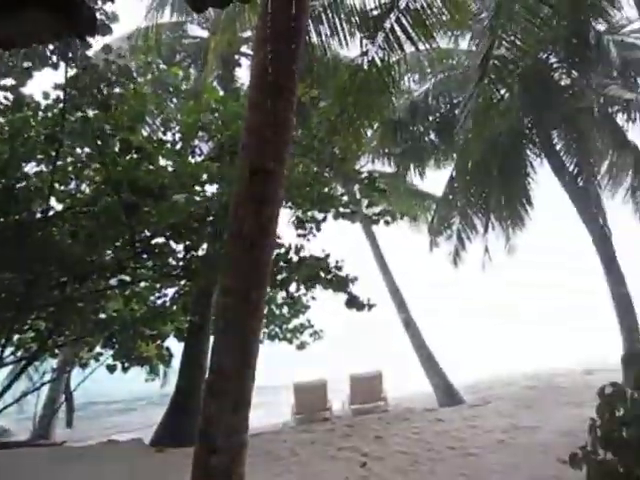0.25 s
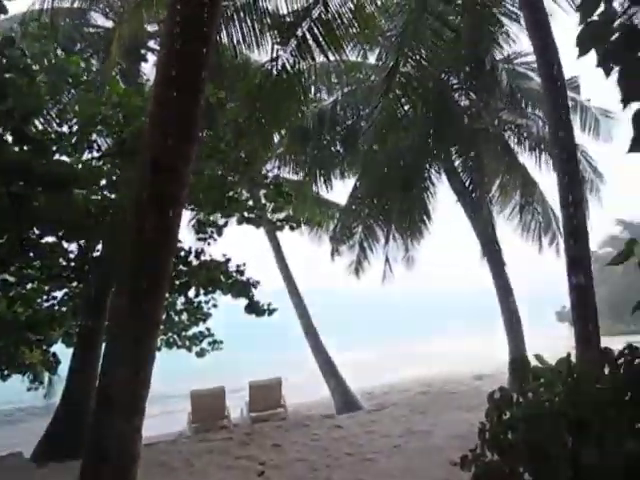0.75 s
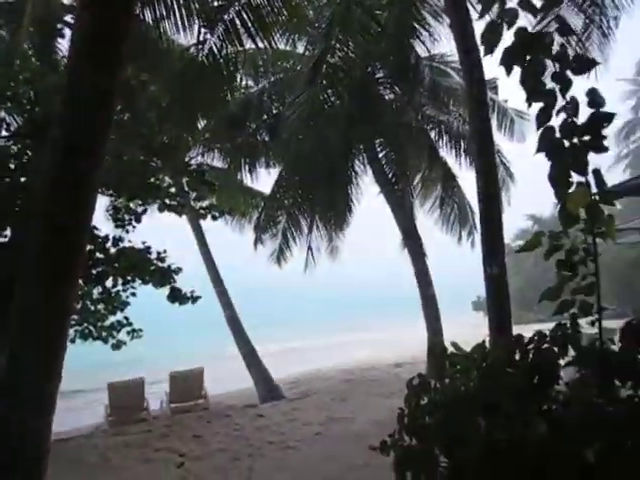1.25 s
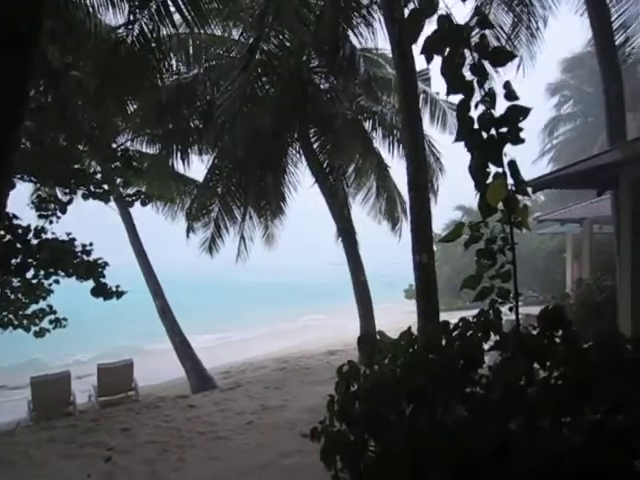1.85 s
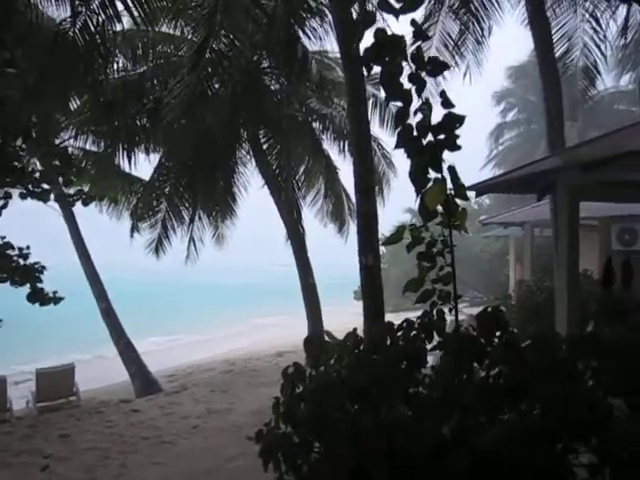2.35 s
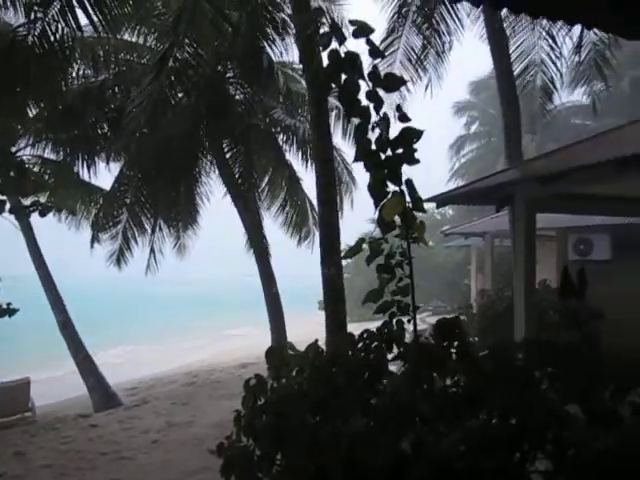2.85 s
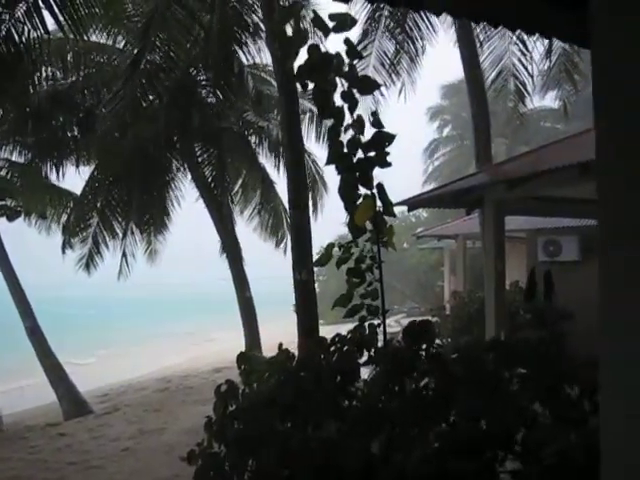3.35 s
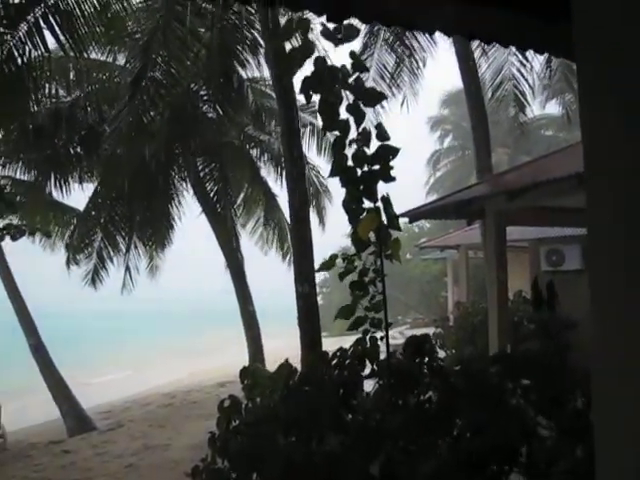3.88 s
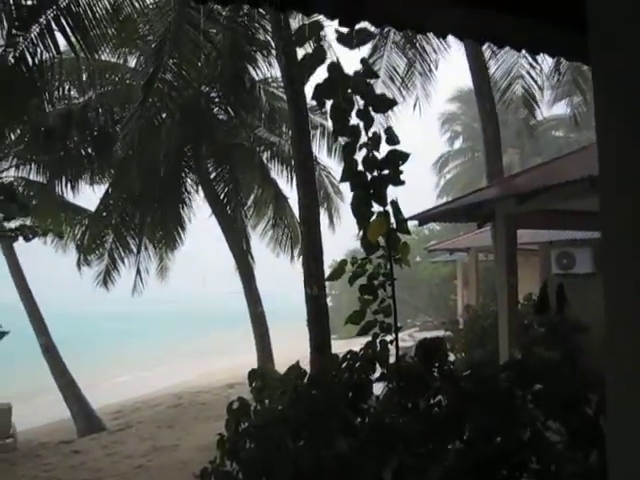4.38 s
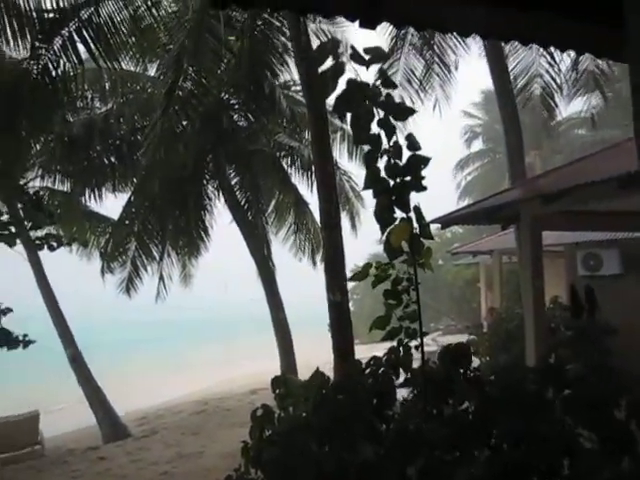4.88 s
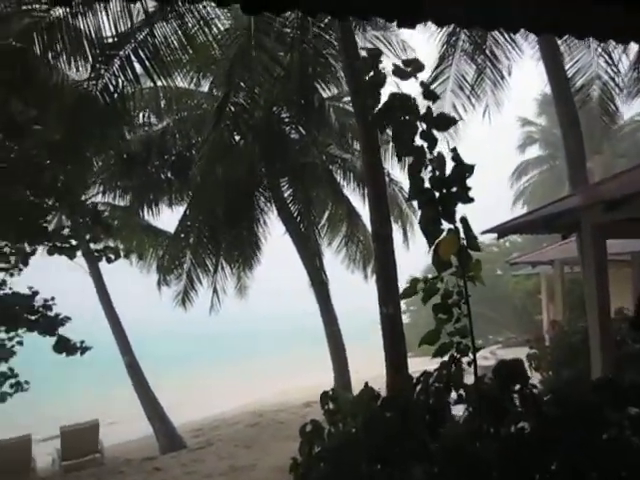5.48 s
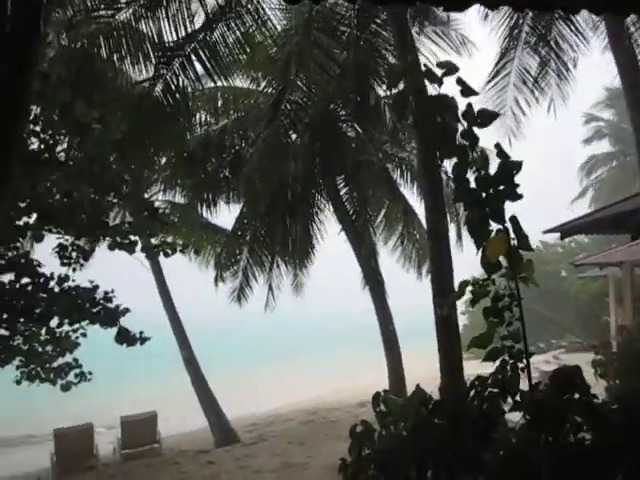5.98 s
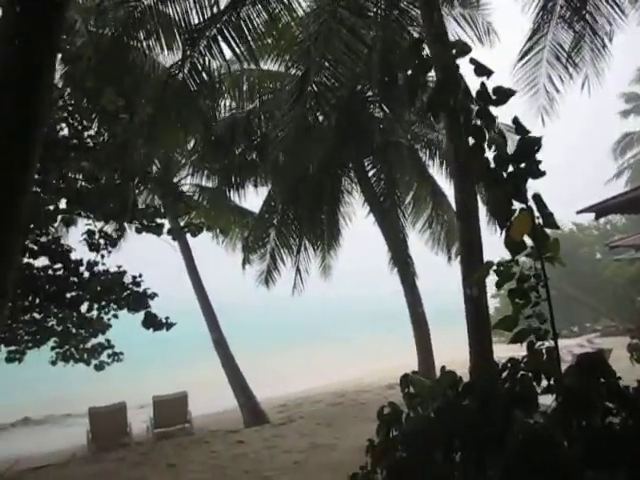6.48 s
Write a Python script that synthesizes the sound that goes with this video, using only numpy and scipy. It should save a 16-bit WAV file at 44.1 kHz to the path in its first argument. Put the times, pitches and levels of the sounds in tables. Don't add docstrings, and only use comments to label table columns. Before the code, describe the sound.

From the start, heavy rain is at full strength and stays nearly constant to the end at about 6.7 seconds: a broad midrange roar from sand and distant foliage under a dense, bright, grainy hiss from leaves. Fine ticks pepper it throughout, with a few crisp drops at 0.3 to 0.5. At 0.98 the sound almost vanishes for some 40 milliseconds, with a very faint ring, then quickly recovers. Low, blunt wind bumps strike the microphone from 1.27 to 1.63, strongest near 1.5, and more softly from 2.28 to 2.65. A bright drop snaps at 2.5, a lower spatter comes around 3.25, and a strong tick at 3.86. From 4 onwards the hiss is slightly brighter, with frequent leaf drops and short splashes, notably at 5.93. Faint wind remains near the end. Close small microphone, dry outdoor space, nearly mono with slight treble width.

```python
import sys
import numpy as np
from scipy import signal
from scipy.fft import rfft, irfft, next_fast_len
from scipy.io import wavfile
from scipy.ndimage import uniform_filter1d, map_coordinates

SR = 44100
rng = np.random.default_rng(int(sys.argv[2]) if len(sys.argv) > 2 else 0)


def undo_db(level):
    steps = np.asarray(level, float) / 20
    return 10 ** steps


def inscribe(sig):
    pcm = np.round(np.clip(np.atleast_2d(sig).T, -1, 1) * 32767)
    wavfile.write(sys.argv[1], SR, pcm.astype(np.int16))


N = 296793
TOP_HZ = 15735

# [t/s, level/dB]
DOWNPOUR = [
    (0.0, -22),
    (0.75, -21),
    (0.92, -22),
    (1.14, -21.5),
    (1.31, -21),
    (2.34, -21.5),
    (3.07, -21.5),
    (5.77, -22),
    (6.73, -21.5),
]
# [t/s, share]
FACING_LEAVES = [(0, 0.25), (.7, 0.1), (1.1, 0), (1.4, 0.04), (2.0, .1), (2.6, 0.25), (3.3, .3),
                 (4.0, 0.97), (4.8, 0.6), (5.6, 0.8), (6.2, 1), (6.73, .8)]
# [f/Hz, level/dB per Hz]
ROAR_SPECTRUM = [(9.4, -59), (16, -25), (37, -24.5), (70, -16), (103, -14), (260, -10), (290, -7.5),
                 (323, -8), (456, -5), (486, -3), (658, -0.5), (1110, 0), (1460, -4), (2070, -2.5),
                 (2800, -4), (3640, -53), (6160, -120)]
# [f/Hz, level/dB per Hz]
HISS_SPECTRUM = [(1710, -31.5), (2900, -1), (12300, -3.5), (14600, -9), (15700, -14.5)]
# [f/Hz, level/dB]
NEAR_RESPONSE = [(300, -60), (900, -6), (1500, 0), (12000, 0), (14500, -6), (15700, -16), (16500, -40)]
UNLIKE_BLOCKS = [.067, .184, .32, .32, 0.344, .602, .602, .925, 1.297, 1.39, 1.39, 1.39, 2.203, 2.203,
                 2.272, 2.67, 2.67, 3.063, 3.063, 3.363, 3.387, 4.407, 4.71, 4.71, 4.71, 5.64, 5.64, 6.243,
                 6.661]
# [t/s, peak level/dB, ring f/Hz]
BIG_DROPS = [(0.2854, -12.7, 7493), (0.4063, -15.3, 2842), (0.4846, -14.8, 10077), (2.2929, -14.4, 11369),
             (2.4888, -11.1, 9646), (2.8129, -14.5, 9819), (3.4813, -14.3, 8096), (3.664, -14.5, 6632),
             (3.7271, -14.2, 7751), (3.7997, -13.8, 5857), (3.864, -9.0, 5254), (4.2148, -14.9, 10594),
             (4.3039, -14.5, 7579), (4.6298, -13.1, 6287), (4.7876, -14.2, 11541), (4.8095, -14.8, 4565),
             (4.9127, -14.4, 3359), (5.0237, -13.0, 4823), (5.2863, -15.6, 8268), (5.359, -13.2, 12316),
             (5.4334, -13.7, 4392), (5.6005, -13.3, 9905), (5.6992, -14.5, 7321), (5.7682, -14.8, 8613),
             (5.8346, -15.3, 9991), (5.9305, -9.4, 9130), (6.1104, -13.7, 5857), (6.1816, -13.5, 6632),
             (6.4983, -12.6, 5857), (6.6376, -15.6, 9733)]
# [centre t/s,
# level/dB, centre f/Hz]
FROND_SPILLS = [(0.289, -37, 8000), (0.663, -45, 497), (2.295, -33, 11313), (2.494, -28.0, 9513),
                (2.744, -31.5, 4000), (3.26, -29, 750), (3.806, -33, 5656), (3.866, -30, 6727),
                (4.634, -33, 6727), (4.919, -34, 3363), (5.024, -36, 4756), (5.388, -34, 2800),
                (5.933, -29, 8000), (5.986, -31, 1500), (6.111, -30, 6727), (6.186, -32, 5656),
                (6.505, -29, 11313),
                (3.22, -33, 1000),
    (3.30, -40, 800),
    (4.66, -31, 7000),
    (5.88, -31, 12000),
]
# [start t/s, end t/s]
MUTE_SPAN = (.9812, 1.0240)
# [centre t/s, peak level/dB, f/Hz]
SWITCH_RING = (.9955, -39, 2600)
# [peak t/s, buffet level/dB]
GUST_FRONTS = [(1.27, -37), (1.365, -40), (1.415, -41), (1.47, -34), (1.515, -29), (1.61, -30.5),
               (2.285, -39), (2.315, -37), (2.39, -35), (2.49, -36), (2.555, -37), (2.635, -39), (5.9, -50),
               (6.19, -48), (6.35, -46), (6.55, -45), (2.72, -46), (2.82, -48)]
# [f/Hz, level/dB per Hz]
BUFFET_SPECTRUM = [(12, -39), (20, 0), (54, 13), (125, -1), (162, -5), (258, -19), (400, -1), (520, -40),
                   (880, -120)]
# [t/s, peak level/dB, f/Hz]
EDDIES = [(1.2675, -22, 191), (1.403, -31, 209), (1.439, -16.5, 205), (1.4666, -30, 116),
          (1.4755, -30, 193), (1.4944, -27, 164), (1.5096, -25, 195), (1.522, -17, 206), (1.6028, -36, 135),
          (1.514, -25, 95), (1.6205, -19, 110), (1.6304, -34, 160), (2.2778, -25, 111), (2.2985, -22, 134),
          (2.3145, -17, 145), (2.3226, -22, 144), (2.3871, -24, 118), (2.463, -27.0, 209),
          (2.4892, -18.5, 202), (2.5564, -30, 147),
          (1.439, -22, 380),
    (1.503, -16, 300),
    (1.520, -22, 400),
    (1.6286, -16.5, 400),
    (2.48, -27, 210),
    (2.631, -28, 90),
]


def unit(x):
    return x / np.sqrt(np.mean(x ** 2) + 1e-20)


def along(points, hz):
    f, v = np.transpose(points)
    return np.interp(np.log(hz + 1), np.log(f + 1), v)


def over_time(rows):
    s, value = np.transpose(rows)
    return np.interp(np.arange(N) / SR, s, value)


def wobble(rate):
    knots = rng.standard_normal(int(N * rate / SR) + 4)
    return map_coordinates(knots, [np.arange(N) * rate / SR])


def coloured(x, spectrum):
    m = next_fast_len(N + 8192)
    response = undo_db(along(spectrum, np.fft.rfftfreq(m, 1 / SR)))
    return unit(irfft(rfft(x, m) * response, m)[:N])


def patchy(patchy_db):
    z = signal.stft(rng.standard_normal(N), nperseg=512)[2]
    field = uniform_filter1d(rng.standard_normal(z.shape), size=12, axis=0)
    field = uniform_filter1d(field, size=6, axis=1)
    return unit(signal.istft(z * undo_db(patchy_db * unit(field)), nperseg=512)[1][:N])


def rings(s, size, hz, cycles, count):
    t = np.arange(count) / SR
    wave = size[:, None] * np.sin(2 * np.pi * hz[:, None] * t)
    wave = wave * undo_db(-60 * t * hz[:, None] / cycles)
    where = np.round(s * SR).astype(int)[:, None] + np.arange(count)
    return np.bincount(where.ravel(), wave.ravel(), N + count)[:N]


def patter(count, spread_db):
    when, big, sign = rng.random((count, 3)).T
    size = undo_db(-spread_db * np.log(1.012 - big)) * np.sign(sign - .5)
    return unit(np.bincount((when * N).astype(int), size, N))


def rain():
    pour_db, facing = over_time(DOWNPOUR), over_time(FACING_LEAVES)
    shower = wobble(21.76)
    roar = patchy(patchy_db=0.56) + 0.29 * patter(count=9000, spread_db=2.5)
    hiss = patchy(patchy_db=.9) + .6 * patter(count=12000, spread_db=2.8)
    roar_db = pour_db - 3.5 - 1.52 * facing + .35 * wobble(6)
    hiss_db = pour_db - 2.5 + 0.5 * facing + .35 * wobble(6)
    far = undo_db(roar_db + 0.32 * shower) * coloured(roar, ROAR_SPECTRUM)
    leaves = undo_db(hiss_db + 0.54 * shower) * coloured(hiss, HISS_SPECTRUM)
    return far + leaves


def ticks():
    when, big, pitch = rng.random((2000, 3)).T
    size = undo_db(-24.5 - 3.5 * np.log(1.035 - big))
    return rings(when * N / SR, size, 1200 * 10 ** pitch, cycles=5.1, count=160)


def unlike_bands(mono):
    pair = np.array([mono, mono])
    block, width_hz = 2048, 1500
    hz = np.fft.rfftfreq(block, 1 / SR)
    window = np.sin(np.pi * np.arange(block) / block) ** 1.7
    lows_hz = rng.permutation(np.linspace(4200, 14400, len(UNLIKE_BLOCKS)))
    shifted = np.roll(mono, SR // 8)
    for centre, low_hz in zip(UNLIKE_BLOCKS, lows_hz):
        at = round(centre * SR) - block // 2
        band = (hz > low_hz) & (hz < low_hz + width_hz)
        own = irfft(band * rfft(mono[at:at + block]))
        other = irfft(band * rfft(shifted[at:at + block]))
        pair[:, at:at + block] += window * (undo_db(-2.5) * other * [[1], [-1]] - 0.28 * own)
    return pair


def drops():
    s, db, hz = np.transpose(BIG_DROPS)
    db = db + 4 * np.log2(np.minimum(hz / 6500, 1))
    out = np.zeros(N)
    modes = [(1, 0), (1.22, -2), (.82, -4)]
    for k, (ratio, rel_db) in enumerate(modes):
        start = s - .0004 + .00012 * k
        mode_hz = np.minimum(ratio * hz, 14000)
        out += rings(start, undo_db(db + 2 + rel_db), mode_hz, cycles=26, count=260)
    return out


def splashes():
    out, t = np.zeros(N + SR), np.arange(SR // 12) / SR
    shape = t / 0.0044 * np.exp(1 - t / 0.0049)
    for s, db, hz in FROND_SPILLS:
        edges_hz = [hz * .8, min(hz * 1.25, TOP_HZ)]
        band = signal.butter(2, edges_hz, "bandpass", fs=SR, output="sos")
        spray = unit(signal.sosfilt(band, rng.standard_normal(len(t))))
        out[round((s - .007) * SR):][:len(t)] += undo_db(db + 4.5) * shape * spray
    return out[:N]


def recovery(s, tau):
    t = np.arange(N) / SR
    return np.exp(-np.abs(t - s) / tau) * (t >= s)


def input_gain():
    t = np.arange(N) / SR
    start, end = MUTE_SPAN
    ducks = sum(-2 * recovery(s + .002, 0.035) for s, db, hz in BIG_DROPS if db > -12.5)
    back = -6.5 * recovery(end, .012) - 1 * recovery(end, .3)
    leak = np.maximum(-26 - 650 * (t - start), -41)
    return np.where((t >= start) & (t < end), leak, ducks + back)


def capacitor_discharge():
    return -undo_db(-35) * recovery(MUTE_SPAN[0], .04)


def switch_ring():
    t = np.arange(N) / SR
    s, db, hz = SWITCH_RING
    return undo_db(db) * np.sin(2 * np.pi * hz * t) * np.exp(-((t - s) / .003) ** 2)


def wind():
    t = np.arange(N) / SR
    strength = np.zeros(N)
    for s, db in GUST_FRONTS:
        before, after = np.maximum(s - t, 0), np.maximum(t - s, 0)
        rise = undo_db(db - 380 * before)
        fall = undo_db(-300 * after) + undo_db(-11 - 70 * after)
        strength = np.maximum(strength, rise * fall)
    buffet = coloured(rng.standard_normal(N), BUFFET_SPECTRUM)
    out = strength * undo_db(-1.0) * unit(undo_db(2.2 * wobble(30)) * buffet)
    for s, db, hz in EDDIES:
        near = slice(round((s - .03) * SR), round((s + .03) * SR))
        u = (t[near] - s) * hz
        out[near] += undo_db(db - .5) * np.cos(2 * np.pi * u - .5) * np.exp(-(u / .58) ** 2)
    return out


def scene():
    near = ticks() + drops()
    near = coloured(near, NEAR_RESPONSE) * np.std(near)
    return np.tile(rain() + near + splashes() + wind(), (2, 1))


def band_limit(x):
    return signal.sosfilt(signal.butter(12, 15870, fs=SR, output="sos"), x)


def record(dry):
    mono = dry[0] * undo_db(input_gain()) + capacitor_discharge() + switch_ring()
    mono = irfft(rfft(mono) * (np.fft.rfftfreq(N, 1 / SR) < TOP_HZ), N)
    return band_limit(unlike_bands(mono))


dry = scene()
out = record(dry)
inscribe(out)
```